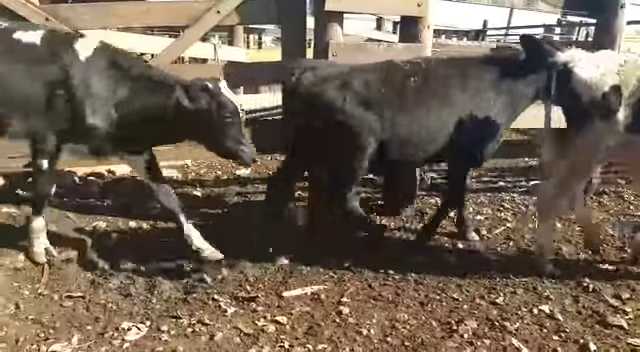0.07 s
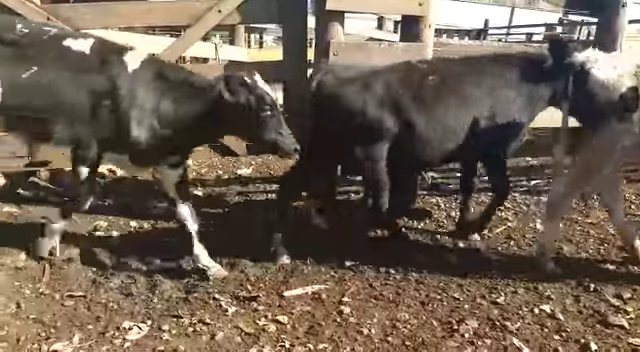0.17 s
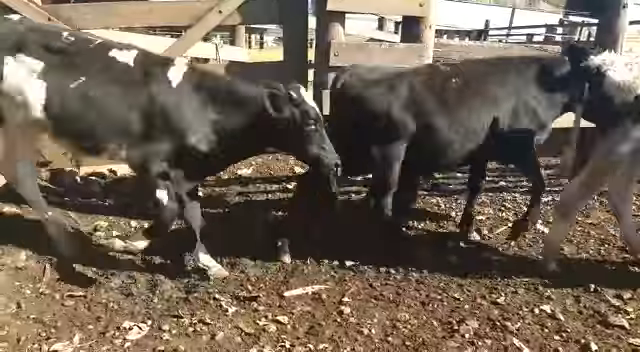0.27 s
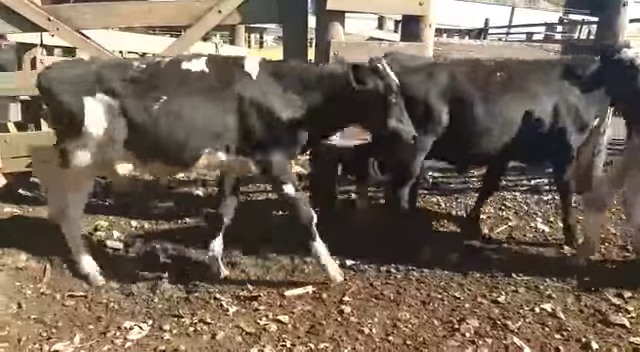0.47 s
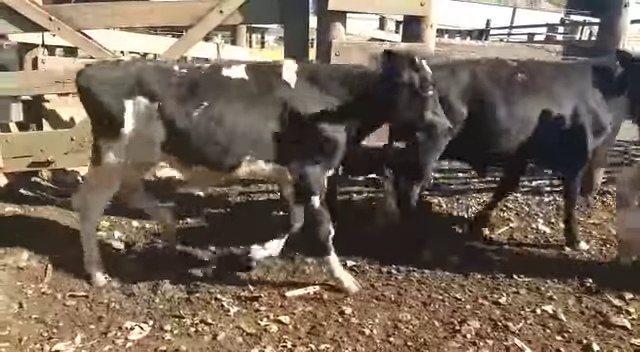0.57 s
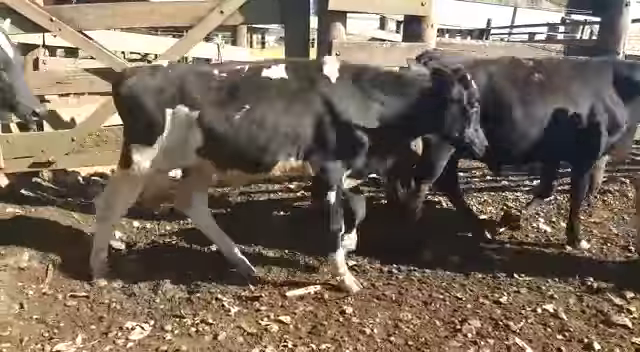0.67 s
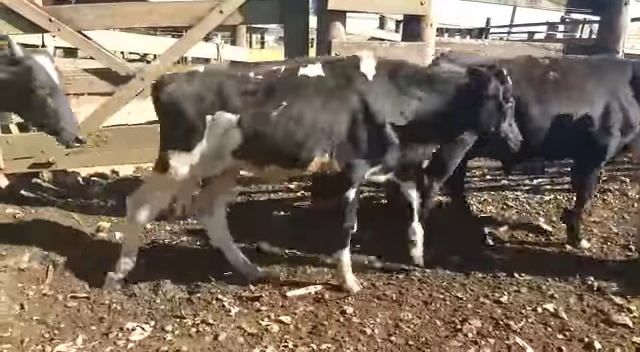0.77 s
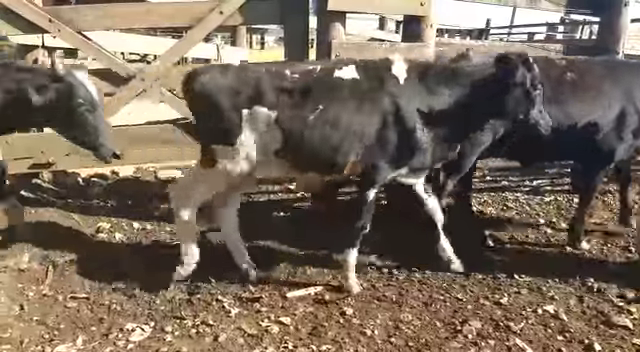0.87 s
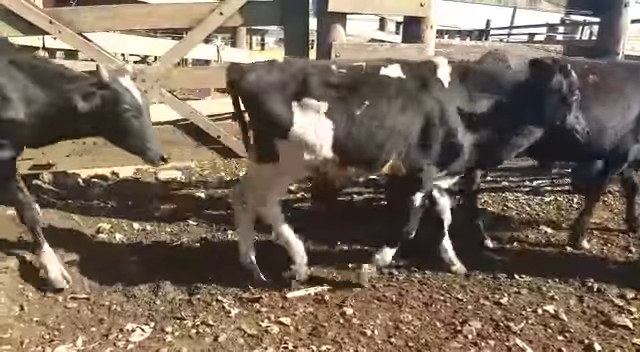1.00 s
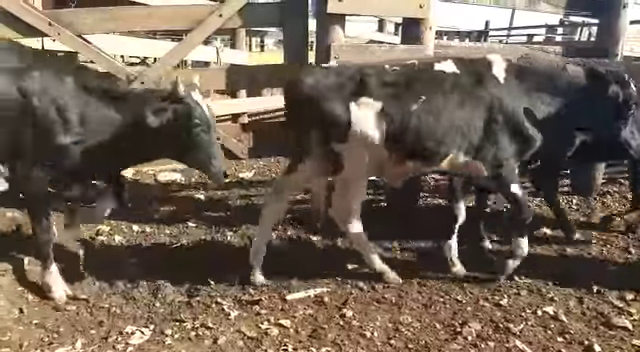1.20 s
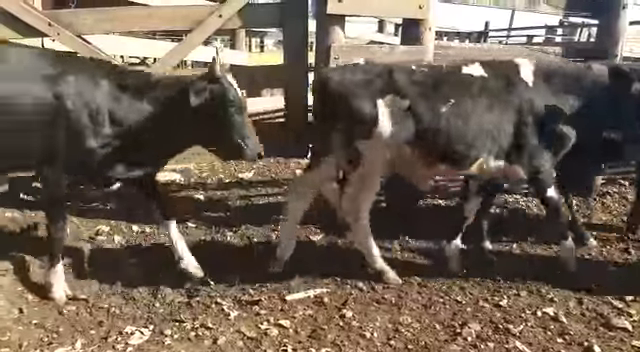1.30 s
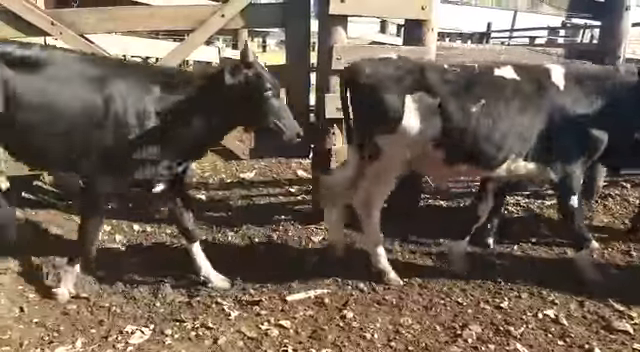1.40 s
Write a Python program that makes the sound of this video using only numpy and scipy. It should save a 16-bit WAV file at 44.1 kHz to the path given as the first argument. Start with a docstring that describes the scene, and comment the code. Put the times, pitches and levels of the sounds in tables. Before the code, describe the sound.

Cattle hooves thump and crunch unevenly on dirt and gravel a few metres away in an outdoor pen. Early on, one knocks twice on a hollow plank; pebbles snap under later steps, over faint shuffling and light wind.

```python
"""A dirt and gravel pen, with cattle walking a few metres away.
Each hoof thumps the ground, crushes clods and grinds grit. One knocks twice on something
hollow like a plank, and pebbles snap. Fences throw back a short echo.
Behind it all are light wind, the shuffling of the herd and a thin, steady whine."""
import sys
import numpy as np
from scipy import signal
from scipy.fft import rfft, irfft
from scipy.io import wavfile
from scipy.ndimage import uniform_filter1d

SR = 44100
rng = np.random.default_rng(int(sys.argv[2]) if len(sys.argv) > 2 else 0)


def to_wav(sig):
    """Store sig (one row per channel, or 1-D mono) as 16-bit WAV at the path in sys.argv[1].

    Samples outside -1..1 are clipped; the rate is SR.
    """
    pcm = np.clip(np.atleast_2d(sig), -1, 1) * 32767
    pcm = np.round(pcm).astype(np.int16)
    wavfile.write(sys.argv[1], SR, pcm.T)  # frames by channels


N = 63945
T = np.arange(N) / SR

# Hooves landing. A fade time (t60) is how long a sound takes to drop by 60 dB.
# Each row: start, rise and fade time in seconds, then thump, clop, crunch and grit levels in dB.
HOOF_FALLS = [ (0.04, 0.0069, 0.47, -49, -52.5, -48.5, -56.5), (0.125, 0.01, 0.2, -43, -42, -38, -50.5),
              (0.184, 0.024, 0.36, -46, -38, -34, -39), (0.24, 0.012, 0.1, -38, -32.5, -25.5, -39),
              (0.297, 0.0093, 0.23, -47.5, -37, -53, -52.5), (0.386, 0.0028, 0.14, -36, -30.5, -54, -49),
              (0.401, 0.0085, 0.13, -49, -27.5, -31, -41), (0.425, 0.0092, 0.28, -67, -40.5, -38, -44),
              (0.565, 0.0038, 0.088, -43, -46, -42.5, -45.5), (0.596, 0.014, 0.036, -46.5, -71, -39.5, -64),
              (0.632, 0.0071, 0.079, -43, -43, -38.5, -52), (0.7249, 0.0053, 0.092, -51, -58, -31.5, -38.5),
              (0.767, 0.0046, 0.21, -42, -46, -42, -49), (1.044, 0.007, 0.11, -39, -36.5, -37.5, -52.5),
              (1.051, 0.016, 0.12, -59, -51, -30, -44.5), (1.079, 0.0071, 0.34, -47.5, -42, -34, -42.5),
              (1.152, 0.0035, 0.16, -66, -44, -35, -75), (1.18, 0.0032, 0.083, -41, -44, -32, -42.5),
              (1.233, 0.0078, 0.12, -39, -41.5, -41, -45.5), (1.407, 0.0015, 0.071, -81, -63, -35.5, -35),
              (1.435, 0.0025, 0.13, -56, -57, -41, -43.5)]
# The tone of the four parts of a step. Each row: frequency in Hz, relative level in dB.
THUMP_TONE = [(25, -32), (45, -12), (70, -16), (115, 2.5), (180, 3.5), (260, -8.5), (600, -38.5)]
CLOP_TONE = [(110, -36), (190, -8.5), (270, -1), (340, -5.5), (420, -3), (540, -14), (800, -28),
             (2000, -46)]
CRUNCH_TONE = [(250, -42), (520, -9.5), (760, 2), (1100, -5), (1600, -1.5), (2000, -2), (2600, -22),
               (4000, -26.5), (12000, -49)]
GRIT_TONE = [(1200, -38.5), (2400, 4), (3300, -1), (4600, -1), (6500, -9), (9000, -9.5), (12000, -13),
             (15500, -33)]
# Hooves hitting packed ground or a stick.
# Each row: start in seconds, pitch in Hz, level in dB, fade time in seconds.
RIM_STRIKES = [(0.0463, 1564, -39.5, 0.028), (0.2165, 762, -20, .08), (0.3883, 290, -22.5, 0.031),
               (0.3890, 1010, -25.5, 0.024), (0.4070, 180, -30.5, .047), (0.4105, 409, -25, 0.058),
               (0.5678, 1410, -35, 0.035), (0.6350, 875, -26, 0.066), (0.638, 1317, -26.5, 0.043),
               (0.7715, 125, -30.5, 0.058), (1.0667, 1726, -27, 0.039), (1.0688, 1050, -23, 0.049),
               (1.0730, 736, -21.5, 0.03), (1.0835, 780, -23, 0.038), (1.1580, 1622, -26, 0.047),
               (1.411, 1035, -31, 0.021), (1.438, 1170, -31, 0.037)]
# A hoof hitting the plank. Each row: start in seconds, ring gain in dB, crack level in dB.
PLANK_KNOCKS = [(0.208, -22.5, -15), (0.2402, -26, -19.5)]
# The notes the plank rings with. Each row: pitch in Hz, relative level in dB, fade time in seconds.
PLANK_NOTES = [(157.5, -17, 0.34), (263, -2, 0.22), (408.6, 3.5, 0.14), (507, -4.5, 0.24), (578, 0, 0.16),
               (765, 6.5, 0.069), (871, -4, 0.18), (973, 10, 0.053), (1099, -1, 0.1), (1201, -3.5, 0.16),
               (1283, 3.5, 0.07), (1430, 9, 0.087), (1583, 2, 0.085), (1650, 4, 0.063), (2330, -5, 0.06)]
# Pebbles breaking under a hoof. Each row: start in seconds, pitch in Hz, snap and rattle strength
# in dB, the rattle's rise and fade time in seconds, gain of the soil's knock in dB.
PEBBLE_SNAPS = [ (0.3203, 5130, -23.5, -36, 0.0027, 0.033, -22),
                (0.5115, 4080, -13.5, -24.5, 0.0015, 0.029, 4.5),
                (0.5160, 4750, -48, -49, 0.0022, 0.16, 17.5), (0.727, 4700, -32, -29, 0.0005, 0.087, -12),
                (0.7268, 9900, -38, -31.5, 0.0049, 0.039, -12),
                (0.7674, 4540, -26, -27, 0.00036, 0.017, -3), (0.922, 9900, -48, -45.5, 0.0047, 0.2, -1),
                (1.1009, 4440, -23, -28.5, 0.0019, 0.031, -10),
                (1.368, 4550, -26, -35, 0.0052, 0.18, -12.5), (1.3777, 9200, -24, -32, 0.0006, 0.026, -18),
                (1.3894, 8400, -32, -37.5, 0.00043, 0.047, -23)]
# Gravel chips clicking together. Each row: start in seconds, pitch in Hz, level in dB.
GRAVEL_TICKS = [(0.254, 6070, -32), (0.4374, 5650, -31.5), (0.4775, 13100, -41), (0.5109, 4750, -23),
                (0.5358, 13100, -35), (0.733, 12300, -27), (1.2155, 9840, -39.5), (1.335, 8600, -37)]
# The tone of the shuffling herd and of the wind. Each row: frequency in Hz, relative level in dB.
SHUFFLE_TONE = [(200, -4.5), (500, 1), (900, 0.5), (1800, 4.5), (3000, -6), (4500, -2.5), (6500, -8.5),
                (9000, -6), (15500, -21)]
WIND_TONE = [(30, -52), (50, -2), (62, 3), (80, 1), (110, -1), (180, -0.5), (280, -3), (400, -13.5),
             (520, -21), (1200, -32)]
# How the shuffling swells and sinks. Each row: time in seconds, level in dB.
SHUFFLE_SWELLS = [(0, -53), (.12, -53.5), (.3, -53), (.62, -49.5), (.705, -57), (.80, -47), (.87, -57.5),
                  (.95, -47), (.985, -57.5), (1.04, -59), (1.17, -65), (1.225, -49), (1.32, -54.5),
                  (1.36, -58.5), (1.42, -50.5)]
# Which side the sound leans to. Each row: frequency in Hz, left minus right in dB.
SIDE_LEAN = [(900, 0), (1650, 2), (2500, 0), (6000, 0), (8300, -1.6), (10500, 0)]

CLOD_GRAINS_PER_S, GRIT_GRAINS_PER_S = 3300, 3700
PLANK_BUILD_CYCLES, CRACK_HZ, CRACK_T60_S = 0.91, 1380, 0.022
SOIL_HZ, SOIL_Q = 1330, 0.8
CHIPS_PER_S, CHIP_LOW_HZ, CHIP_HIGH_HZ, CHIP_CYCLES = 70, 3500, 13500, 14
SHUFFLE_FLICKER_DB, WIND_DB, WIND_GUST_DB = 3, -53.5, 1
WHINE_HZ, WHINE_DB = 15661, -64
LOW_CUT_HZ, TOP_HZ = 56.6, 15780


def hooves():
    """Weight comes onto a hoof: the ground thumps, the hoof clops, clods break and grit grinds."""
    thump = steady(colour(rng.standard_normal(N), THUMP_TONE), samples=500)
    clop = steady(colour(rng.standard_normal(N), CLOP_TONE), samples=300)
    crunch = steady(colour(grains(CLOD_GRAINS_PER_S, spread_db=2), CRUNCH_TONE), samples=300)
    grit = steady(colour(grains(GRIT_GRAINS_PER_S, spread_db=0), GRIT_TONE), samples=500)
    power = 0  # one curve for each part; overlapping steps add their power
    for start, rise, t60, *levels_db in HOOF_FALLS:
        power = power + (gain(levels_db)[:, None] * envelope(start, rise, t60)) ** 2
    return (np.array([thump, clop, crunch, grit]) * np.sqrt(power)).sum(axis=0)


def rim_strikes():
    """The rim of a hoof meets something hard and gives a short knock with a clear pitch."""
    return sum(ping(start, hz, db, t60) for start, hz, db, t60 in RIM_STRIKES)


def plank():
    """A hoof hits with a hard crack, then the wood rings. Its low notes build up last."""
    out = 0
    phases = rng.uniform(0, 2 * np.pi, len(PLANK_NOTES))
    for start, ring_db, crack_db in PLANK_KNOCKS:
        age = np.maximum(T - start, 0)
        ring = 0
        for (hz, note_db, t60), phase in zip(PLANK_NOTES, phases):
            note = gain(note_db) * np.sin(2 * np.pi * hz * T + phase)
            build_up = 1 - np.exp(-age * hz / PLANK_BUILD_CYCLES)
            ring = ring + note * build_up * fade(age, t60)
        crack = -ping(start, CRACK_HZ, crack_db, CRACK_T60_S)
        out = out + gain(ring_db) * ring / 2 + crack
    return out


def pebbles():
    """A stone snaps and its chips rattle. The soil it sits in adds a duller knock."""
    out = 0
    for start, hz, snap_db, rattle_db, rise, t60, soil_db in PEBBLE_SNAPS:
        rattle = steady(grains(per_second=7000, spread_db=4), samples=100)
        force = 2 * gain(rattle_db) * rattle * envelope(start, rise, t60)
        force[int(start * SR)] += 4 * gain(snap_db)  # the snap is one sharp push
        stone = cut(resonate(force, hz, q=2.38), hz * 1.36, "low", order=1)
        soil = resonate(resonate(force, SOIL_HZ, SOIL_Q), SOIL_HZ, SOIL_Q)
        out = out + stone + gain(soil_db) * soil
    return out


def gravel_ticks():
    """Single chips click together and ring briefly, high above the crunch."""
    return sum(ping(start, hz, db, t60=0.007) for start, hz, db in GRAVEL_TICKS)


def pen_echo(sound):
    """Fences and bodies throw back a scatter of short echoes."""
    echoes = grains(per_second=930, spread_db=2) * envelope(start=0.0059, rise=0.0017, t60=0.4)
    return gain(db=-17.5) * signal.fftconvolve(sound, echoes / np.linalg.norm(echoes))[:N]


def herd():
    """The rest of the herd shuffles through gravel: a flickering rustle that swells and sinks."""
    rustle = normalise(colour(grains(per_second=6000, spread_db=1), SHUFFLE_TONE))
    flicker = gain(SHUFFLE_FLICKER_DB * wander(per_second=59.56))
    swell = gain(np.interp(T, *np.array(SHUFFLE_SWELLS).T))
    return (rustle * flicker + loose_chips()) * swell


def loose_chips():
    """Loose gravel gives dry ticks at random, each chip at its own pitch."""
    out = 0
    for when, pitch, softness in rng.random((int(CHIPS_PER_S * N / SR), 3)):
        hz = CHIP_LOW_HZ * (CHIP_HIGH_HZ / CHIP_LOW_HZ) ** pitch
        relative_db = 2 - 3 * np.log(max(softness, 0.03))  # a few ticks stand out
        out = out + ping(when * N / SR, hz, relative_db, t60=CHIP_CYCLES / hz)
    return out


def wind():
    """Light wind makes a low rumble that wavers a little."""
    rumble = steady(colour(rng.standard_normal(N), WIND_TONE), samples=2500)
    return rumble * gain(WIND_DB + WIND_GUST_DB * wander(per_second=13))


def whine():
    """One thin, very high tone that never changes."""
    return gain(WHINE_DB) * np.sqrt(2) * np.sin(2 * np.pi * WHINE_HZ * T)


def gain(db):
    """Turn decibels into a number to multiply by."""
    return 10 ** (np.asarray(db) / 20)


def normalise(x):
    """Scale a signal so its average level (rms) is 1."""
    return x / np.sqrt(np.mean(x ** 2))


def smooth(x, samples):
    """Take a moving average twice."""
    return uniform_filter1d(uniform_filter1d(x, samples), samples)


def steady(x, samples):
    """Hold the level near 1 over stretches of about this many samples."""
    return x / np.sqrt(np.abs(smooth(x ** 2, samples)) + 1e-12)


def fade(age, t60):
    """Die away by 60 dB every t60 seconds, from age 0 on."""
    return np.exp(-np.log(1000) * np.maximum(age, 0) / t60)


def envelope(start, rise, t60):
    """Rise in a straight line, then die away."""
    return np.clip((T - start) / rise, 0, 1) * fade(T - start - rise, t60)


def ping(start, hz, db, t60):
    """One struck note that dies away."""
    age = np.maximum(T - start, 0)
    return gain(db) * np.sin(2 * np.pi * hz * age) * fade(age, t60)


def grains(per_second, spread_db):
    """Tiny impacts at random times. More spread makes their sizes more uneven."""
    hits = rng.random(N) < per_second / SR
    signs = rng.choice([-1, 1], N)
    sizes = gain(spread_db * np.minimum(rng.exponential(size=N), 5))
    return hits * signs * sizes


def wander(per_second):
    """A smooth random drift, usually about 1 in size."""
    hold = int(SR / per_second)
    steps = np.repeat(rng.standard_normal(N)[:N // hold + 1], hold)
    return normalise(smooth(steps, hold)[:N])


def colour(x, tone):
    """Filter a sound so its lows and highs follow a tone table."""
    hz, db = np.array(tone).T
    size = 4096
    freqs = np.maximum(np.arange(size // 2 + 1) * SR / size, 1)
    curve = gain(np.interp(np.log(freqs), np.log(hz), db))
    # Folding the cepstrum makes the filter ring only after a hit, never before it.
    cepstrum = irfft(np.log(curve))
    cepstrum[1:size // 2] *= 2
    cepstrum[size // 2 + 1:] = 0
    return signal.fftconvolve(x, irfft(np.exp(rfft(cepstrum))))[:N]


def resonate(x, hz, q):
    """Keep a band around one pitch. Raising q above 1 narrows it."""
    return signal.lfilter(*signal.iirpeak(hz, max(q, 1), fs=SR), x)


def cut(x, hz, keep, order):
    """Keep the "low" or "high" side of a frequency."""
    return signal.sosfilt(signal.butter(order, hz, keep, fs=SR, output="sos"), x)


def scene():
    """Mix it all, almost in mono: the middle range leans a little left, the treble right."""
    near = hooves() + rim_strikes() + plank() + pebbles() + gravel_ticks()
    mix = near + pen_echo(near) + wind() + herd() + whine()
    freqs = np.arange(N // 2 + 1) * SR / N
    lean_db = np.interp(freqs, *np.array(SIDE_LEAN).T)
    return irfft(rfft(mix) * gain(np.array([lean_db, -lean_db]) / 2), N)


def record(dry):
    """Take away the deepest rumble and the very highest treble."""
    top_cut = signal.ellip(10, 0.2, 70, TOP_HZ, fs=SR, output="sos")
    return signal.sosfilt(top_cut, cut(dry, LOW_CUT_HZ, "high", order=5))


dry = scene()
out = record(dry)
to_wav(out)
```